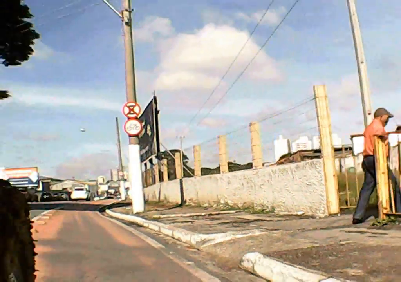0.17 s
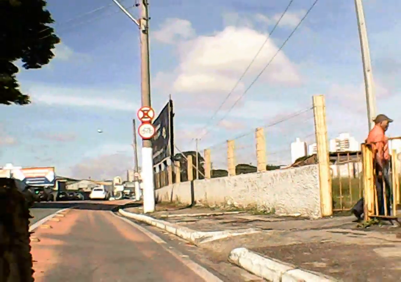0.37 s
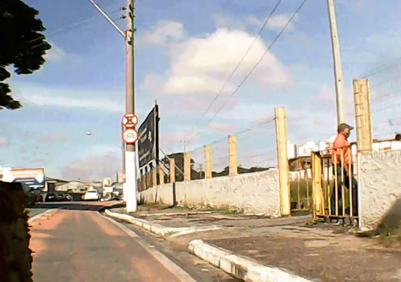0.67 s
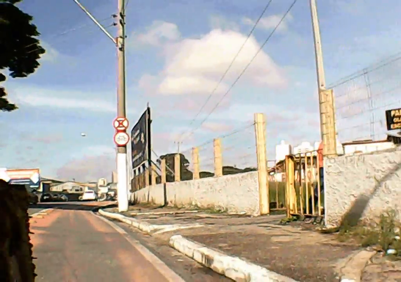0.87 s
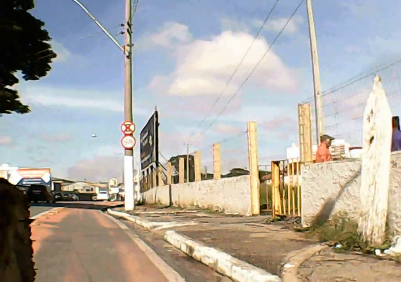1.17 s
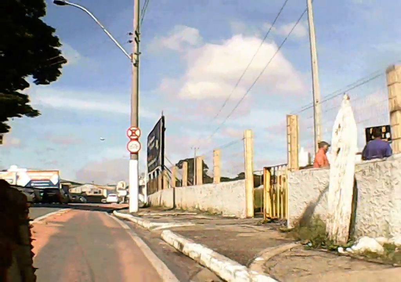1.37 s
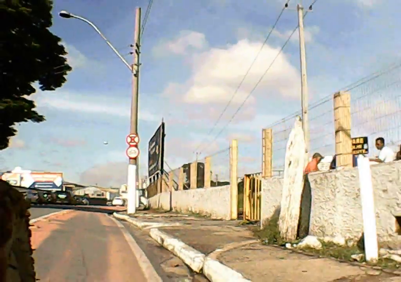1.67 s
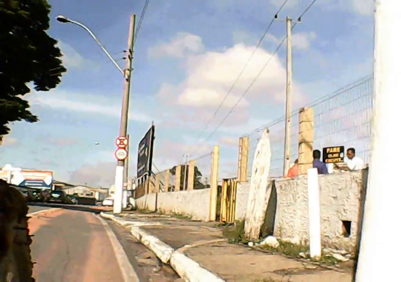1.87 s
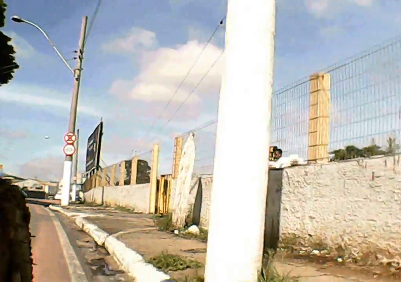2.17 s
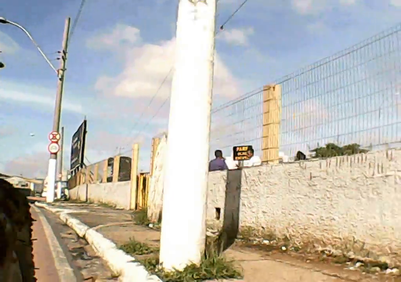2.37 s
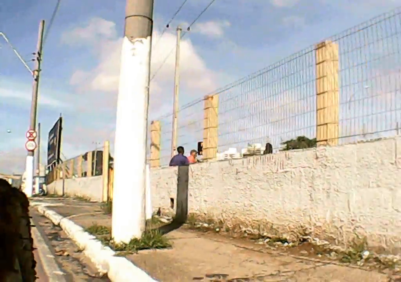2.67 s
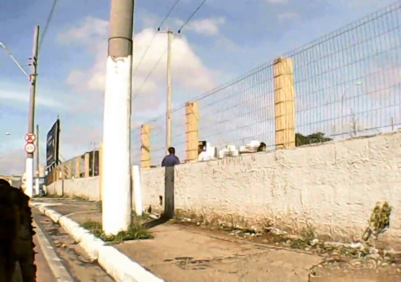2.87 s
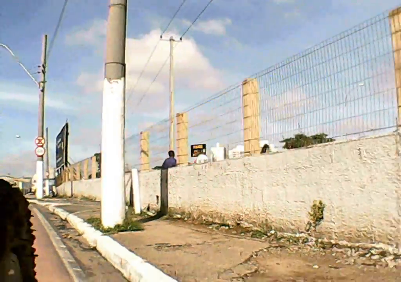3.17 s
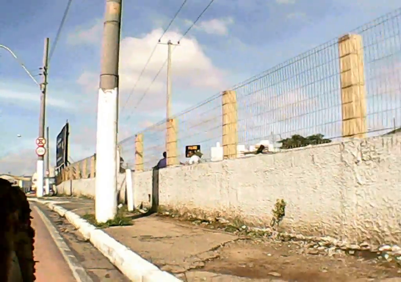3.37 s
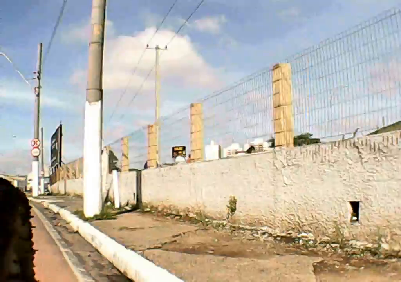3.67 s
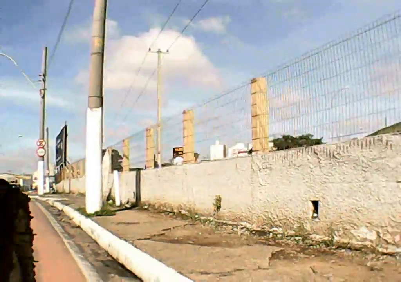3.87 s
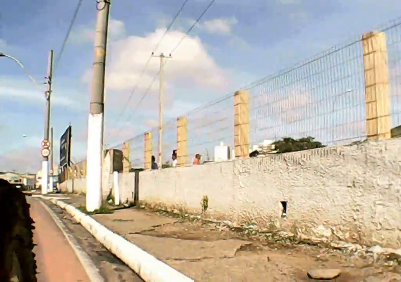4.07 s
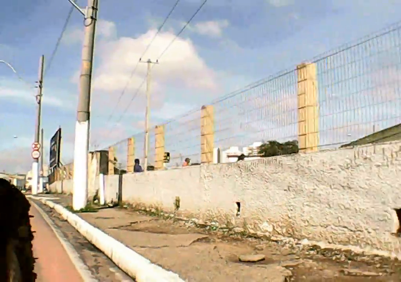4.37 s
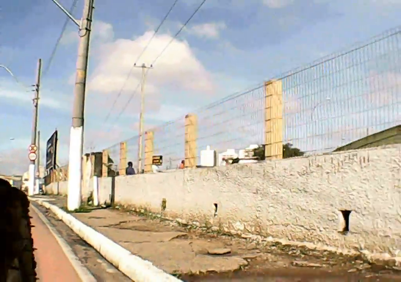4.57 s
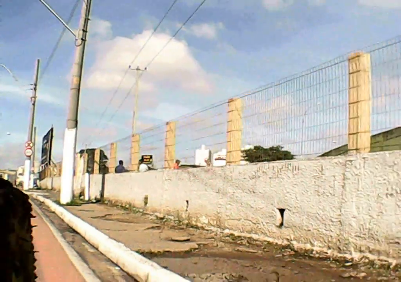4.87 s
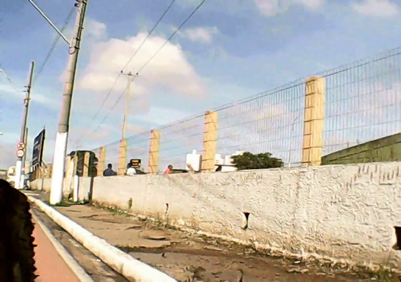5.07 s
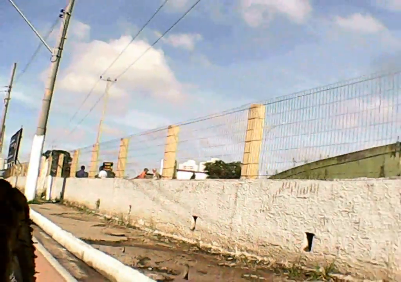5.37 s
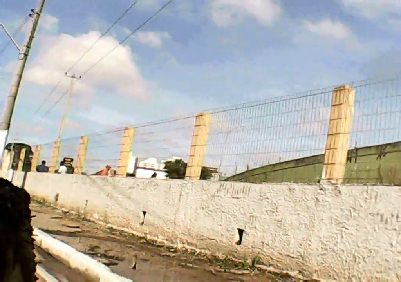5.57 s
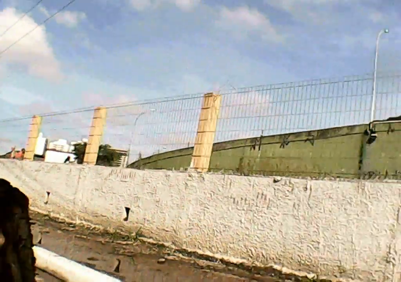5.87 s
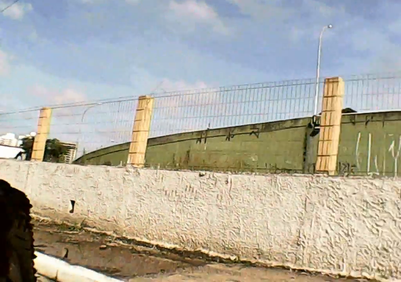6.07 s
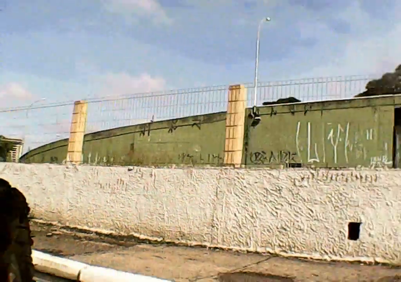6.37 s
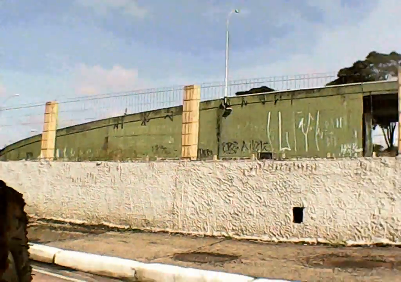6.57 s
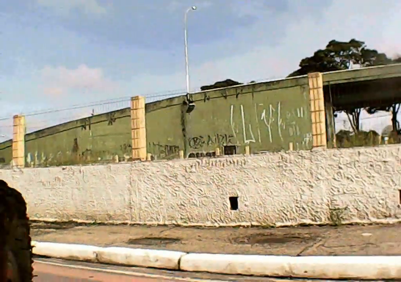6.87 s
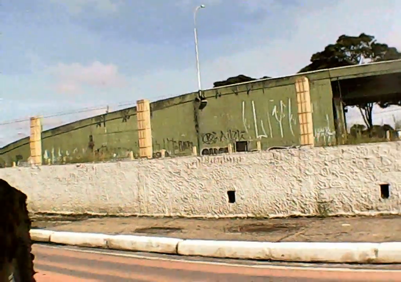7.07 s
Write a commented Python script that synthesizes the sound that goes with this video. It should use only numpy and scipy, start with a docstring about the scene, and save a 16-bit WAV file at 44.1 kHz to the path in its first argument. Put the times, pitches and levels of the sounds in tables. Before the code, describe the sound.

Riding a bicycle along a paved road: buffeting wind, small frame rattles, coasting clicks, a passing car's swell, a sharp loud crack near the end.

```python
"""A small camera rides on a bicycle along a paved road. From the start, noise bands make gusty wind and tyre
rush over a faint engine of harmonic sines; jolts ring the frame's modes, far hums and low thumps come and go.
From 2.8 s freewheel ticks ring the frame and a loose mudguard shudders briefly; then a hum returns twice.
A passing car swells by 4.4 s, its tyres singing as a moving noise band until 5.85 s.
At 6.48 s a hard knock rings the mount and overloads the recorder; wind and jolts continue to the end."""
import sys
import numpy as np
from scipy import signal
from scipy.fft import rfft, irfft, next_fast_len
from scipy.io import wavfile
from scipy.ndimage import uniform_filter1d, map_coordinates

SR = 44100
rng = np.random.default_rng(int(sys.argv[2]) if len(sys.argv) > 2 else 0)


def persist_wave(psi):
    """Save psi, clipped to +-1, as 16-bit WAV."""
    counts = np.round(np.clip(psi, -1, 1) * 32767).astype(np.int16)
    wavfile.write(sys.argv[1], SR, np.atleast_2d(counts).T)


N = 318843

# Airflow past the microphone: start_s, rumble_db, buffet_db
WIND = [(0, -30.5, -30), (.6, -34, -32.5), (1, -29, -28), (2.2, -30, -28), (2.55, -30.5, -27.5),
        (2.75, -30.5, -23), (2.95, -32, -27.5), (3.4, -34, -33), (4, -28.5, -26), (4.35, -27, -23.5),
        (4.9, -33, -27.5), (5.3, -32.5, -27.5), (5.7, -27, -22), (6.02, -32, -25.5), (6.12, -19, -17),
        (6.36, -25.5, -21.5), (6.55, -31, -24.5), (6.9, -25, -23), (7.05, -19.5, -17), (7.14, -26, -22.5),
        (7.23, -28, -16)]
# Spectral densities before scaling to rms 1: frequency_hz, density_db (per Hz)
RUMBLE_SPECTRUM = [(8, -19.5), (16, -11), (24, -1), (40, -0.5), (70, -2), (130, -15.5), (170, -32.5),
                   (290, -120)]
BUFFET_SPECTRUM = [(41, -34.5), (70, -1), (152, 1), (216, -2), (249, -2), (284, -7), (420, -8.5),
                   (550, -32.5), (920, -120)]
EDDY_DB = 1  # random swing of the rumble
# Single eddies that thump on the port: centre_s, peak_db, pitch_hz
THUMPS = [(1.282, -13.5, 54.6), (1.804, -15, 34.8), (2.61, -12.5, 59.6), (4.206, -13, 90),
          (5.59, -10, 89.3), (6.094, -10, 109.7), (6.148, -11.5, 155), (6.241, -7, 99), (6.334, -5, 161),
          (6.349, -12, 95), (6.652, -14, 70), (6.851, -13, 40), (7.063, -10, 70.4), (7.076, -4, 150),
          (7.093, -7, 110), (7.123, -7, 55), (7.203, -6.5, 173), (7.225, -11.5, 90)]
THUMP_CYCLES = 0.43  # from the centre of a thump to 1/e of its envelope

# Tyres and traffic: start_s, roar_db, drone_db, hiss_db
ROAD = [(0, -32.5, -32.5, -33.5), (.55, -28.5, -35, -30), (.9, -31, -35, -33), (2.25, -29.5, -38.5, -35),
        (2.7, -30, -34.5, -34), (2.95, -26, -32, -32), (3.4, -28, -30, -31), (4, -23.5, -27.5, -27.5),
        (4.2, -22, -26, -25), (4.5, -20, -28, -22.5), (4.75, -23, -24, -26.5), (4.95, -27, -22, -28.5),
        (5.1, -23.5, -26, -30), (5.25, -23.5, -26.5, -28.5), (5.65, -23, -25.5, -28.5),
        (5.95, -28.5, -32.5, -35), (6.24, -21.5, -27.5, -27), (6.48, -26.5, -36.5, -33.5),
        (6.93, -26.5, -32.5, -29), (7.23, -23.5, -27.5, -33)]
# Spectral densities before scaling to rms 1: frequency_hz, density_db (per Hz)
ROAR_SPECTRUM = [(130, -37.5), (220, -5.5), (248, 0.5), (306, 1), (421, 3), (662, 2), (900, -5),
                 (1170, -31.5), (1980, -120)]
DRONE_SPECTRUM = [(470, -30), (800, -1.5), (959, -0.5), (1300, -5.5), (1690, -35), (2860, -120)]
HISS_SPECTRUM = [(900, -32), (1200, -6), (1580, -3), (1880, -9), (2110, -13.5), (2410, -15), (2750, -17.5),
                 (3180, -23.5), (3940, -22.5), (4400, -20), (6000, -24)]

# Engine of the passing car; end rows hold outside their times: start_s, firing_hz, level_db (before the lift)
ENGINE = [(3.4, 33.25, -42.5), (3.8, 32.96, -32.5), (4.2, 32.37, -32.5), (4.4, 32.2, -22.5),
          (4.65, 32.4, -27), (5, 31.22, -32.5), (5.4, 31.12, -46)]
# Harmonics of the firing rate: multiple, level_db (relative)
ENGINE_ORDERS = [(2, -4.5), (3, -8), (4, -3), (5, -0.5), (8, -4), (13, -8), (15, -12)]
ENGINE_LIFT_DB = 1.5

# Modes of the frame, levels relative: frequency_hz, level_db, t60_s
FRAME_MODES = [(1581, 4, 0.027), (1865, -2, 0.032), (2373, -1.5, 0.023), (2490, -4, .025),
               (2970, -12, 0.031), (3357, -14.5, 0.03), (3615, -13.5, 0.026), (3964, -16, 0.028),
               (4064, -16, 0.026)]
# Single rattles, ticks and bounces at given times, loud and soft: centre_s, level_db (before the trim)
RATTLES = [(.0953, -23), (.2404, -17.5), (.2944, -17.5), (.433, -16), (.5591, -18), (.592, -23),
           (.675, -20), (.7387, -19.5), (.8784, -21), (.9896, -17.5), (1.0291, -15.5), (1.1632, -19),
           (1.272, -16.5), (1.296, -23), (1.378, -30), (1.435, -18.5), (1.4974, -34), (1.633, -29),
           (1.659, -21), (1.701, -16), (1.8168, -20.5), (1.8494, -19), (1.929, -16.5), (2.2648, -25),
           (2.2882, -18), (2.3326, -14), (2.4504, -20), (2.5458, -15), (2.592, -27), (2.6918, -19.5),
           (5.492, -12.5), (6.41, -30), (6.423, -28), (6.512, -13.5), (6.7101, -21.5), (6.8444, -18),
           (6.8642, -22), (6.9127, -31), (6.949, -20), (7.1227, -12), (7.1576, -25), (7.196, -17)]
JOLT_TRIM_DB = -4.5  # from the jolt level to its actual peak
FAINT_DB, FAINT_RANGE_DB = -28.5, 12.5  # loudest random jolt before the trim, and the range below it
FAINT_DULL_DB = -7  # change of the upper modes in a random faint jolt
PEDALLING_S = 2.75  # the chain rattles until the rider coasts
JOLT_LEAD_S = .006  # the first contacts come before the jolt is full

# Brief far hums: start_s, hold_s, pitch_hz, level_db, width_hz
HOOTS = [(0.146, .03, 536, -34, 63), (0.328, 0.18, 552, -28.5, 38), (3.449, 0.065, 440, -34, 18),
         (3.648, 0.12, 432, -31, 20)]
HOOT_RISE_S, HOOT_FALL_S = 0.14, 0.12  # times to change by 20 dB

# Freewheel, pawl ticks counted so far; the slope is the tick rate: start_s, tick_count
PAWL_COUNT = [(2.832, 0), (2.889, 2), (2.936, 4), (2.972, 5), (3.017, 7), (3.097, 10), (3.198, 13),
              (3.318, 16), (3.391, 18), (3.588, 24), (3.758, 29), (3.939, 34), (4.11, 39), (4.217, 42),
              (4.766, 57), (5.062, 65), (5.4335, 75), (5.5515, 78), (5.7265, 83), (5.807, 85), (6.027, 91),
              (6.186, 95), (6.267, 97), (6.354, 99)]
# Ordinary ticks, lowest mode before random spread: start_s, level_db
PAWL_LEVEL = [(2.83, -26), (2.97, -21.5), (3.1, -31), (3.66, -22.5), (4.5, -19.5), (5.2, -23.5), (5.9, -20),
              (6.36, -25)]
# Pawl ticks with their own levels: start_s, lowest_db, middle_db, bright_db
OWN_TICKS = [(2.824, -38, -26, -31), (2.887, -33, -19, -25), (2.911, -21, -13, -27),
             (2.933, -11.5, -12.5, -20.5), (2.971, -6, -13.5, -38), (2.987, -18, -16.5, -25),
             (3.013, -14, -29, -27.5), (3.068, -22, -25, -24.5), (3.099, -30, -27, -27),
             (3.129, -27, -30, -28), (3.197, -24, -25, -30), (3.159, -24.5, -23, -20.5),
             (3.233, -25, -26, -24), (3.276, -22, -16, -27), (3.316, -17, -18, -25), (3.352, -26, -16, -28),
             (3.39, -12.5, -27, -26), (3.424, -29, -31, -29), (3.457, -26, -30, -21.5),
             (3.49, -15, -18, -23), (3.523, -14, -22, -23), (3.557, -19, -28, -19), (3.587, -22, -14, -25),
             (3.654, -23, -24, -24), (3.724, -26, -20, -34), (3.758, -41, -17, -24.5),
             (3.938, -18, -20.5, -30), (4.005, -30, -31, -24), (4.04, -29, -29, -23),
             (4.077, -26, -25, -19), (4.108, -19.5, -16, -21.5), (4.182, -22, -25, -19),
             (4.765, -11, -14, -21), (4.832, -22, -27, -19), (4.911, -14, -19, -26),
             (5.059, -31, -22, -19.5), (5.096, -34, -17, -26), (5.17, -28, -13, -27),
             (5.245, -18, -12.5, -28), (5.32, -14, -16, -21.5), (5.434, -11, -16, -23.5),
             (5.547, -11, -16, -26), (5.584, -16, -18, -23), (5.621, -25, -24, -23),
             (5.805, -27.5, -15.5, -26.5), (5.842, -23, -15, -29), (5.876, -23, -22, -25.5),
             (5.916, -14, -17, -29), (5.953, -25, -26, -32), (5.988, -17, -21, -22), (6.028, -23, -14, -30),
             (6.066, -30, -19, -24), (6.106, -31, -15.5, -25), (6.146, -18, -16, -23),
             (6.186, -16, -22, -23), (6.264, -12.5, -12.5, -33)]
TICK_SPREAD_DB, COLOUR_SPREAD_DB = 1.5, 2  # from tick to tick
MIDDLE_DB, BRIGHT_DB = -2, -4.5  # second and upper frame modes in an ordinary tick, over the lowest
CRACK_DB = -7.5  # over the upper modes
SOFT_S = .002  # attack time constant of a greased tick

# Modes of the loose mudguard, levels relative: frequency_hz, level_db, t60_s
MUDGUARD_MODES = [(755, -2, .045), (795, 0, .045), (1560, -9, .03)]
# Mudguard buzzing along: start_s, hold_s, level_db (gain of its ring)
SHUDDER = [(2.873, 0.036, -21), (2.935, 0.054, -15), (3.037, 0.13, -23.5)]
SHAKE_RISE_S, SHAKE_FALL_S = 0.046, .03  # times to change by 20 dB
BUZZ_DB = -7.5  # rms of the steady shaking at unit gain

# Singing tyres of the passing car: start_s, centre_hz, level_db
SING = [(4.45, 869, -40), (4.62, 933, -27), (4.75, 900, -32.5), (4.92, 1100, -32), (5.1, 1037, -26.5),
        (5.3, 1015, -34), (5.6, 830, -35.5), (5.85, 773, -49)]
SING_WIDTH_HZ = 220

# Modes of the mount, levels before the attack: frequency_hz, level_db, t60_s, delay_s
MOUNT_MODES = [(1553, 7, .04, .0004), (1262, 3, .055, .002), (1765, 6, .035, 0), (2355, -3, .035, .001),
               (3300, -14, .045, .001), (3755, -14, .045, .001), (2630, -13, .05, .001),
               (722, 5, .055, .0098), (765, 3, .055, .0098), (620, -9, .1, .012), (1020, -7, .09, .005),
               (346, -14, .2, .016), (248, -8, .12, .01), (190, -12, .12, .008), (840, -1, .04, .008),
               (4050, -28, .15, .003)]
KNOCK_S = 6.4842

OFFSET = -.104  # of full scale
EDGE_HZ, STOP_HZ = 4120, 4760  # the converter's band limit
SMOOTH_HZ, TOP_HZ = 7900, 15800  # the smoothing after the converter, and the final cutoff


def amp(db):
    """Decibel law: a level becomes an amplitude ratio."""
    return 10 ** (np.asarray(db) / 20)


def unit(x):
    """Power normalisation: the signal is scaled to rms 1."""
    return x / np.sqrt(np.mean(x ** 2) + 1e-20)


def curves(rows):
    """Linear interpolation: one value per sample for each column after the time."""
    s, *cols = np.transpose(rows)
    return [np.interp(np.arange(N) / SR, s, c) for c in cols]


def wobble(rate):
    """Slow random modulation: a smooth curve through rate random knots a second."""
    knots = rng.standard_normal(int(N * rate / SR) + 4)
    return map_coordinates(knots, [np.arange(N) * rate / SR])


def filtered(x, response):
    """Linear filtering: the spectrum is multiplied by a response of frequency."""
    m = next_fast_len(N + SR // 2)
    return irfft(rfft(x, m) * response(np.fft.rfftfreq(m, 1 / SR)), m)[:N]


def rush(spectrum, patchy_db):
    """Turbulent noise: a coloured spectrum of rms 1 whose gain varies in patches of time and frequency."""
    f, db = np.transpose(spectrum)
    z = signal.stft(rng.standard_normal(N), nperseg=512)[2]
    field = uniform_filter1d(rng.standard_normal(z.shape), size=5, axis=0)
    field = uniform_filter1d(field, size=10, axis=1)
    patchy = signal.istft(z * amp(patchy_db * unit(field)), nperseg=512)[1][:N]
    return unit(filtered(patchy, lambda hz: amp(np.interp(np.log(hz + 1), np.log(f + 1), db))))


def ringing(hz, db, t60, t, attack):
    """Modal decay: damped sines, one row per mode, silent before t = 0."""
    t = np.maximum(t, 0)
    envelope = amp(db - 60 * t / t60) * (1 - np.exp(-t / attack))
    return envelope * np.sin(2 * np.pi * hz * t)


def swell(start, hold, db, rise, fall):
    """Exponential growth and decay: gain rises, holds and falls, straight in dB."""
    t = np.arange(N) / SR - start
    slope = np.maximum(-t / rise, (t - hold) / fall)
    return amp(db - 20 * np.maximum(slope, 0))


def narrow_noise(hz, width_hz):
    """Quadrature modulation: two random curves on one carrier make rms-1 noise round a fixed or moving centre."""
    phase = 2 * np.pi * np.cumsum(hz * np.ones(N)) / SR
    return unit(wobble(width_hz) * np.cos(phase) + wobble(width_hz) * np.sin(phase))


def wind():
    """Turbulent pressure: eddies press on the microphone port in lumps shared by rumble and buffet."""
    rumble_db, buffet_db = curves(WIND)
    lumps = wobble(25)
    rumble = unit(amp(0.45 * lumps + EDDY_DB * wobble(11)) * rush(RUMBLE_SPECTRUM, patchy_db=0.6))
    buffet = unit(amp(1.0 * lumps + 0.39 * wobble(55)) * rush(BUFFET_SPECTRUM, patchy_db=1.4))
    return amp(rumble_db) * rumble + amp(buffet_db) * buffet + thumps()


def road():
    """Rolling contact noise: tread on tarmac and traffic, all bands shaken together by the coarse surface."""
    roar_db, drone_db, hiss_db = curves(ROAD)
    coarse = wobble(30)
    roar = unit(amp(0.29 * coarse) * rush(ROAR_SPECTRUM, patchy_db=1.5))
    drone = unit(amp(0.95 * coarse) * rush(DRONE_SPECTRUM, patchy_db=0.57))
    hiss = unit(amp(0.23 * coarse + 0.76 * wobble(9)) * rush(HISS_SPECTRUM, patchy_db=1.27))
    return amp(roar_db) * roar + amp(drone_db) * drone + amp(hiss_db) * hiss


def engine():
    """Harmonic series: multiples of the firing rate, each swelling on its own over a wavering pitch."""
    hz, db = curves(ENGINE)
    phase = 2 * np.pi * np.cumsum(hz * (1 + .003 * wobble(8))) / SR
    tone = np.zeros(N)
    for multiple, level_db in ENGINE_ORDERS:
        start_phase = 2 * np.pi * rng.random()
        tone += amp(level_db + 2.2 * wobble(4.5)) * np.sin(multiple * phase + start_phase)
    return amp(db + ENGINE_LIFT_DB) * tone


def rattle():
    """Impact excitation: flurries of tiny contacts drive the frame's modes, at given times and at random."""
    hz, db, t60 = np.transpose(FRAME_MODES)[..., None]
    out, t = np.zeros(N + SR), np.arange(SR // 10) / SR
    chance = rng.random((200, 2))
    faint = np.c_[chance[:, 0] * PEDALLING_S, FAINT_DB - FAINT_RANGE_DB * chance[:, 1]]
    for k, (s, level_db) in enumerate([*RATTLES, *faint]):
        is_random = k >= len(RATTLES)
        dull_db = FAINT_DULL_DB * is_random * (hz > hz[1])
        mode_db = db + dull_db + rng.normal(0, 1.4, hz.shape)
        body = ringing(hz, mode_db, t60, t, attack=0.001).sum(axis=0)
        u = t / (.011 + .014 * rng.random())  # time in units of the flurry's length
        flurry = np.sqrt(u) * np.exp(-2 * u ** 2) * rng.standard_normal(len(t))
        jolt = signal.fftconvolve(flurry, body)[:len(t)]
        first = round(abs(s - JOLT_LEAD_S) * SR)
        out[first:][:len(t)] += amp(level_db + JOLT_TRIM_DB) * jolt / np.abs(jolt).max()
    return out[:N]


def hoot(start, hold, hz, db, width_hz):
    """Narrow-band noise: a short smeared hum."""
    return swell(start, hold, db, HOOT_RISE_S, HOOT_FALL_S) * narrow_noise(hz, width_hz)


def thumps():
    """Pressure pulse: an eddy pushes the membrane in and lets it swing back, about one low cycle."""
    t = np.arange(N) / SR
    out = np.zeros(N)
    for s, db, hz in THUMPS:
        envelope = np.exp(-((t - s) * hz / THUMP_CYCLES) ** 2)
        out += amp(db) * envelope * np.cos(2 * np.pi * hz * (t - s))
    return out


def pawl_times():
    """Ratchet kinematics: a tick falls when the running count passes a whole number."""
    when, count = np.transpose(PAWL_COUNT)
    return np.interp(np.arange(count[-1] + 1), count, when)


def freewheel():
    """Impulse response: each tick is a dry crack that rings the frame; some have their own colour."""
    hz, db, t60 = np.transpose(FRAME_MODES)[..., None]
    out, t = np.zeros(N), np.arange(SR // 10) / SR
    times = pawl_times()
    size, *colour = rng.standard_normal((len(times), 4)).T
    usual_db = np.interp(times, *np.transpose(PAWL_LEVEL)) + TICK_SPREAD_DB * size
    mode_db = usual_db[:, None] + [0, MIDDLE_DB, BRIGHT_DB] + COLOUR_SPREAD_DB * np.transpose(colour)
    ticks = np.c_[times, mode_db]
    for own in OWN_TICKS:  # each takes the place of the nearest ordinary tick
        ticks[np.argmin(np.abs(times - own[0]))] = own
    for s, lowest_db, middle_db, bright_db in ticks:
        detune, scatter = rng.standard_normal((2, len(FRAME_MODES), 1))
        upper_db = bright_db + db[2:] - db[2] + 2.6 * scatter[2:]
        levels_db = np.r_[[[lowest_db], [middle_db]], upper_db]
        ring = ringing(hz * (1 + 0.012 * detune), levels_db, t60, t, attack=SOFT_S)
        crack_gain = amp(bright_db + CRACK_DB - 60 * t / 0.014) * (1 - np.exp(-t / SOFT_S))
        crack = crack_gain * rng.standard_normal(len(t))
        out[round(s * SR):][:len(t)] += ring.sum(axis=0) + crack
    return out


def shudder():
    """Forced vibration: a loose hollow mudguard rings with every pawl tick and buzzes roughly between them."""
    hz, db, t60 = np.transpose(MUDGUARD_MODES)[..., None]
    ring = ringing(hz, db, t60, np.arange(SR // 8) / SR, attack=SOFT_S).sum(axis=0)
    times, blows = pawl_times(), np.zeros(N)
    signs = rng.choice([-1, 1], len(times))
    blows[np.round(times * SR).astype(int)] = amp(rng.normal(0, 1.4, len(times))) * signs
    buzz = amp(BUZZ_DB) * unit(signal.fftconvolve(rng.standard_normal(N), ring)[:N])
    shake = sum(swell(s, hold, db, SHAKE_RISE_S, SHAKE_FALL_S) for s, hold, db in SHUDDER)
    return signal.fftconvolve(shake * blows, ring)[:N] + shake * buzz


def sing():
    """Moving resonance: a noise band's centre rises and sinks while the car draws level and away."""
    hz, db = curves(SING)
    t = np.arange(N) / SR
    passing = (t > SING[0][0]) * (t < SING[-1][0])
    return amp(db) * narrow_noise(hz, SING_WIDTH_HZ) * passing


def knock():
    """Delayed modal response: small bright parts ring first, then the mount's body; a noise puff dies with it."""
    hz, db, t60, delay = np.transpose(MOUNT_MODES)[..., None]
    out, t = np.zeros(N), np.arange(SR // 3) / SR
    puff_gain = amp(7.0 - 60 * t / 0.048) * (1 - np.exp(-t / 0.00051))
    puff = puff_gain * uniform_filter1d(rng.standard_normal(len(t)), size=8)
    rings = ringing(hz, db, t60, t - delay, attack=.0014)
    out[round(KNOCK_S * SR):][:len(t)] = rings.sum(axis=0) + puff
    return out


def scene():
    """Superposition: air, road, car, hums and bicycle add at the microphone."""
    surroundings = wind() + road() + engine() + sing()
    hums = sum(hoot(*row) for row in HOOTS)
    bicycle = rattle() + freewheel() + shudder() + knock()
    return (surroundings + hums + bicycle)[None]


def converter_response(hz):
    """Band limiting: a steep edge leaves a weak shelf, which ends at a second edge."""
    edge = 1 / (1 + (hz / EDGE_HZ) ** 44)
    return (edge + amp(-22)) / (1 + (hz / STOP_HZ) ** 60)


def smoothing_response(hz):
    """Low-pass smoothing: the treble falls to a weak shelf."""
    return amp(-26) + (1 - amp(-26)) / (1 + (hz / SMOOTH_HZ) ** 16)


def record(dry):
    """Nonlinear overload: the preamp saturates, a narrow converter adds an offset, and overshoot clips."""
    saturated = dry[0] / (1 + np.abs(dry[0] / .84) ** 5) ** (1 / 5)
    narrow = filtered(saturated, converter_response)
    clipped = np.clip(narrow + OFFSET, -1, 1) - OFFSET
    smooth = filtered(clipped, smoothing_response)
    hiss = amp(-97) * rng.standard_normal(N)
    return np.clip(filtered(smooth, lambda hz: hz < TOP_HZ) + hiss + OFFSET, -1, 1)[None]


dry = scene()
out = record(dry)
persist_wave(out)
```